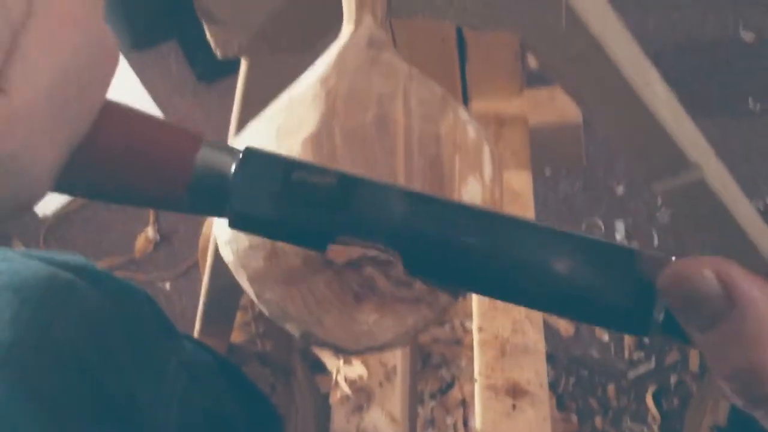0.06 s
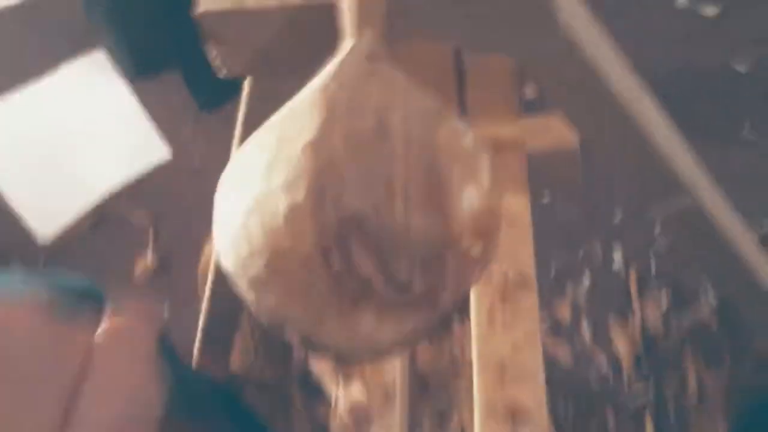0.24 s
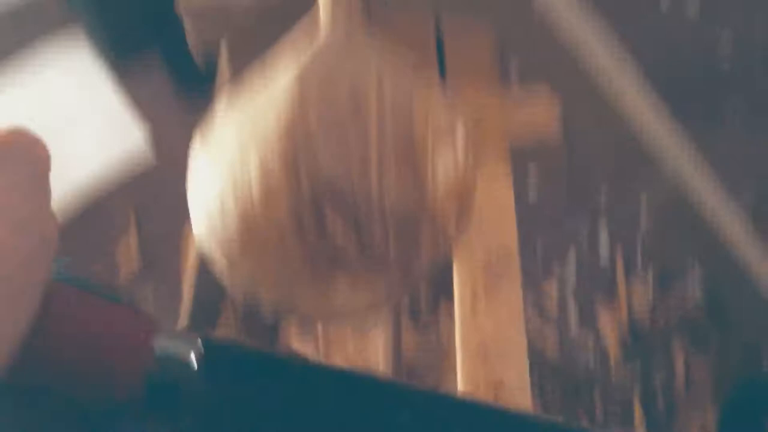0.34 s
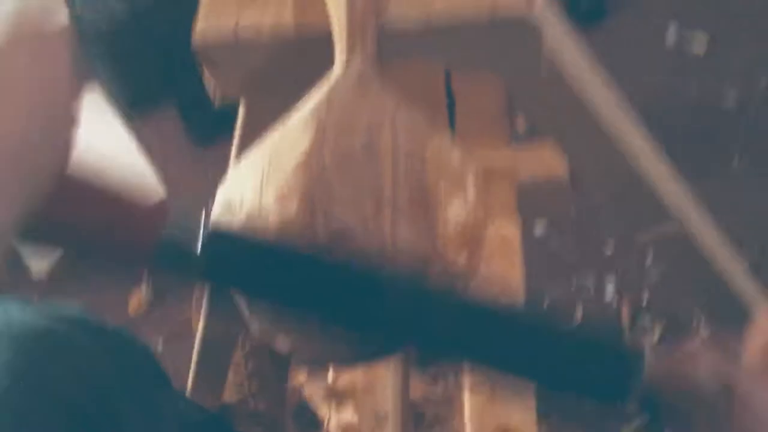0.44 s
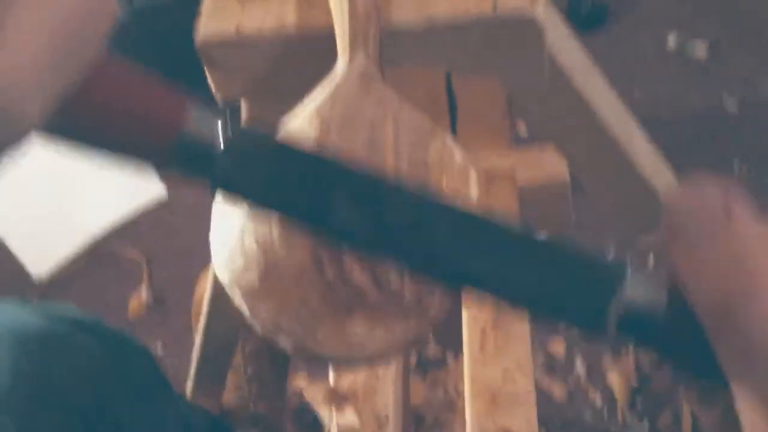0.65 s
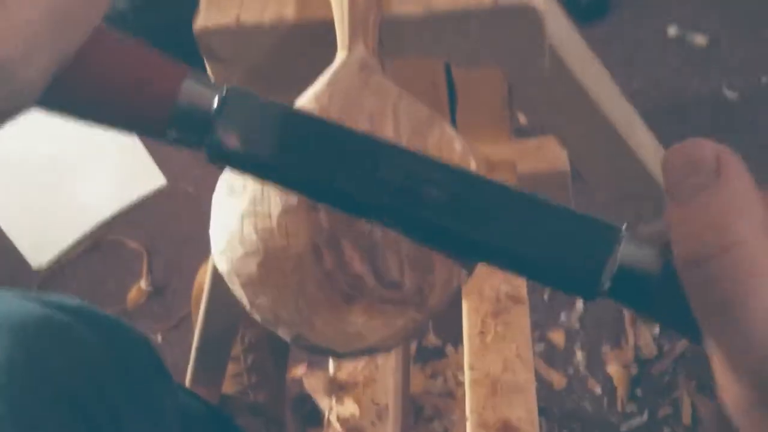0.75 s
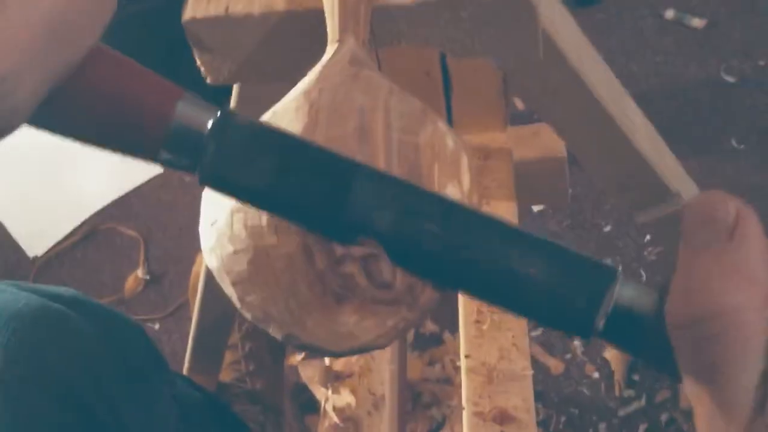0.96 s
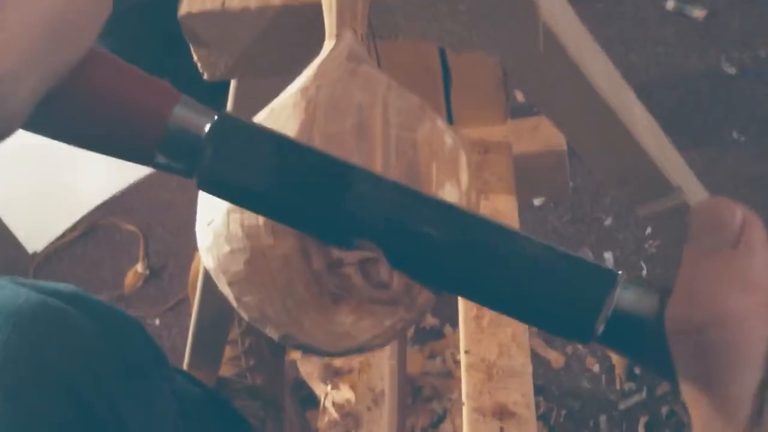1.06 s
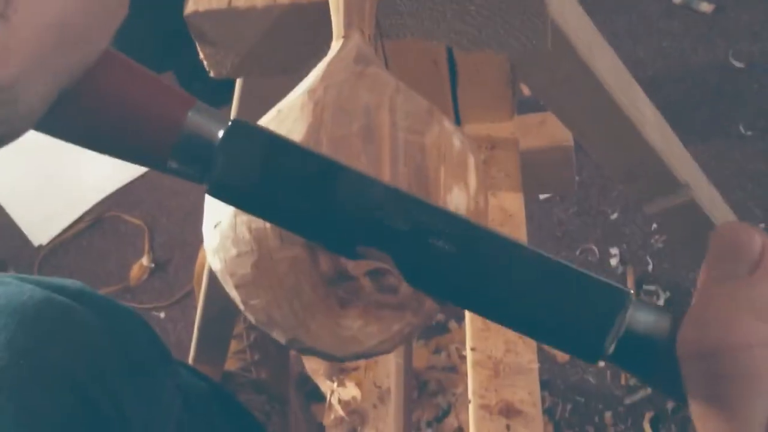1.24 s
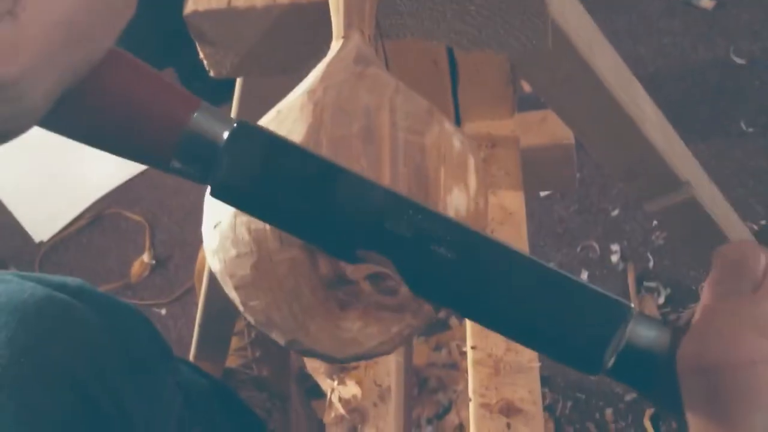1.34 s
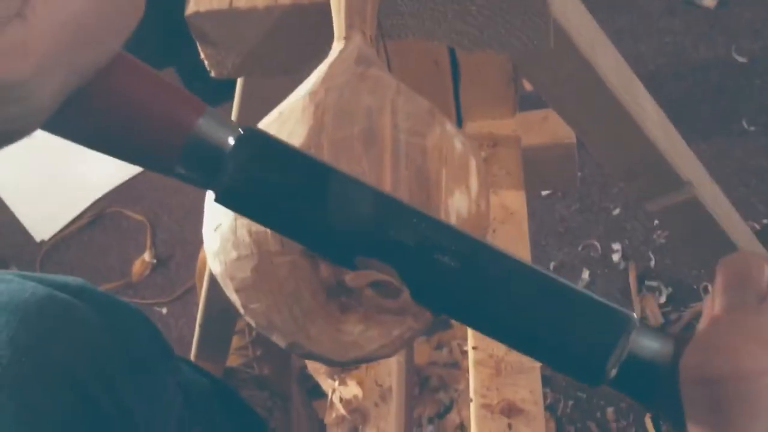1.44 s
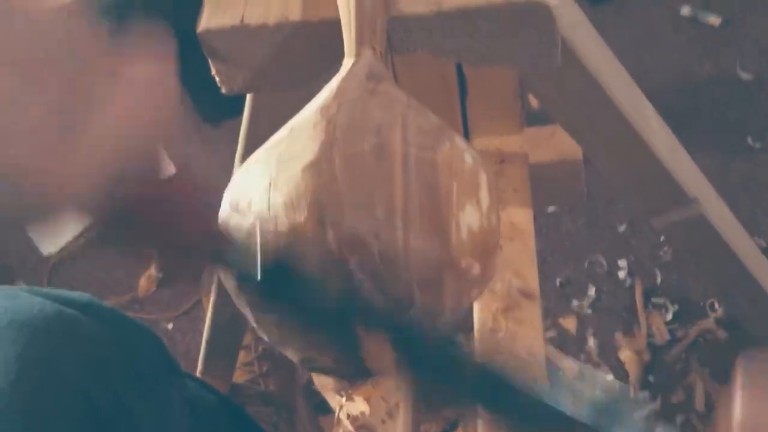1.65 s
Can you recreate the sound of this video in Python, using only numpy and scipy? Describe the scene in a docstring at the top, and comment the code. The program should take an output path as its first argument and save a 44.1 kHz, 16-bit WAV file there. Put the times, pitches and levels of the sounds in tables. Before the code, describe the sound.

Close scraping of a blade cutting wood, with chips snapping off between brief pauses.

```python
"""A drawknife shaves a wooden spoon blank clamped in a shaving horse, close by in a small workshop.
Each stroke is a dense crackle of tearing fibres that shakes the bench; a skidding edge sings briefly.
Chips snap off and set blade and blank ringing; the bench booms as it recoils.
Between strokes the blade is set down on the wood with a dull knock. Faint room air lies underneath."""
import sys
import numpy as np
from scipy import signal
from scipy.fft import rfft, irfft
from scipy.io import wavfile
from scipy.ndimage import uniform_filter1d

SR = 44100
rng = np.random.default_rng(int(sys.argv[2]) if len(sys.argv) > 2 else 0)


def output_pcm(signal):
    """Save a mono or channel-first signal as 16-bit PCM at the path in sys.argv[1].

    Samples are clipped to [-1, 1] before scaling.
    """
    pcm = np.clip(np.atleast_2d(signal).T, -1, 1) * 32767
    wavfile.write(sys.argv[1], SR, np.round(pcm).astype(np.int16))


N = 74970
T = np.arange(N) / SR
CRACK_RISE_S = 0.00026


def amp(db):
    """Decibels to gain."""
    return 10 ** (np.asarray(db) / 20)


def unit(x):
    """Scale to rms 1."""
    return x / np.sqrt(np.mean(x ** 2) + 1e-20)


def log_interp(points, hz):
    """Interpolate (f/Hz, value) points over log frequency."""
    f, value = np.transpose(points)
    return np.interp(np.log(hz + 1), np.log(f), value)


def add(mix, start_s, sound):
    """Mix a sound in at start_s."""
    part = mix[round(start_s * SR):][:len(sound)]
    part += sound[:len(part)]


def colour(x, spectrum, bass_db=0, treble_db=0, peak_hz=1000, peak_db=0, size=4096):
    """Minimum-phase filter: the spectrum at unit power, then two shelves and one peak or dip."""
    bass_hz, treble_hz, peak_sigma_oct = 840, 4500, 0.28
    hz = np.abs(np.fft.fftfreq(size, 1 / SR))
    bass = bass_db / (1 + (hz / bass_hz) ** 4)
    treble = treble_db * (1 - 1 / (1 + (hz / treble_hz) ** 4))
    peak = peak_db * np.exp(-.5 * (np.log2((hz + 1) / peak_hz) / peak_sigma_oct) ** 2)
    log_gain = np.log(unit(amp(log_interp(spectrum, hz))) * amp(bass + treble + peak))
    taps = np.fft.ifft(np.exp(np.conj(signal.hilbert(log_gain)))).real
    return signal.fftconvolve(x, taps[:size // 2])[:len(x)]


def ring(modes, rise_s, size=12000):
    """Struck object: decaying sines of alternating sign, soft onset."""
    t = T[:size]
    sines = sum((-1) ** k * amp(db - 60 * t / t60_s) * np.sin(2 * np.pi * hz * t)
                for k, (hz, db, t60_s) in enumerate(modes))
    return (1 - np.exp(-t / rise_s)) * sines


def burst(decay_s, size=8192):
    """Short crush of fibres: decaying whitened noise."""
    envelope = np.exp(-T[:size] / decay_s) * (1 - np.exp(-T[:size] / CRACK_RISE_S))
    spectrum = rfft(rng.standard_normal(size) * envelope)
    x = irfft(spectrum / (abs(spectrum) + 1e-12)) * np.sqrt(envelope)
    return x * np.sqrt(decay_s * SR / 2) / np.linalg.norm(x)


def room(x, delay_s=0.0024, early_db=9.5, early_decay_s=0.021, smooth_bins=70):
    """Dense early reflections from bench and floor, then the workshop's short tail; whitened."""
    # reverberation time: f/Hz, t60/s
    t60_curve = [(100, 0.96), (300, 1), (700, .43), (1400, .45), (2500, 0.31), (5000, .33), (10000, 0.11),
                 (16000, 0.19)]
    hz, t, noise = signal.stft(rng.standard_normal(SR), SR, nperseg=256)
    decay = amp(-60 * t / log_interp(t60_curve, hz)[:, None])
    tail = signal.istft(noise * decay, SR, nperseg=256)[1][:SR]
    arrived = T[:SR] > delay_s
    early_boost = 1 + amp(early_db) * np.exp(-T[:SR] / early_decay_s)
    spectrum = rfft(tail * arrived * early_boost)
    power = uniform_filter1d(uniform_filter1d(abs(spectrum) ** 2, smooth_bins), smooth_bins)
    response = (irfft(spectrum / np.sqrt(power), SR) * arrived)[:SR // 2]
    return signal.fftconvolve(x, response / np.linalg.norm(response))[:N]


def air(rms_db=-68.5):
    """Workshop air: steady, low-pitched noise."""
    # noise spectrum: f/Hz, level/dB
    spectrum = [(25, -30), (70, -26), (110, -18), (170, 6.5), (260, 0), (400, -17.5), (700, -20),
                (1400, -26), (2500, -40.5), (6000, -44.5), (16000, -43)]
    return amp(rms_db) * unit(colour(rng.standard_normal(N), spectrum))


def knocks(room_db=-8.5):
    """Blade or handles tap the blank: dull burst plus ringing modes."""
    # taps: t/s, level/dB, decay/s, treble/dB
    taps = [(.357, -38.5, 0.0018, -22), (0.492, -52, 0.0016, 6), (.6180, -27, 0.0026, 10),
            (0.6227, -35.5, 0.0043, -33)]
    # impact spectrum: f/Hz, level/dB
    spectrum = [(40, -56), (90, -40), (170, 3.5), (300, 4), (530, 5.5), (950, -3.5), (1400, -1.5),
                (1800, -3), (2500, -13.5), (3900, -17), (4700, -21.5), (5800, -63), (12000, -67)]
    # modes rung by a tap: f/Hz, level/dB, t60/s
    modes = [(181.3, -10.5, 0.085), (268.4, -15, 0.19), (364.5, -14.5, 0.16), (528, -10.5, 0.1),
             (1402, -18, 0.15), (1800, -32, 0.057)]
    x = np.zeros(N)
    for start_s, db, decay_s, treble_db in taps:
        add(x, start_s, amp(db) * colour(burst(decay_s), spectrum, treble_db=treble_db))
        add(x, start_s, amp(db) * ring(modes, rise_s=decay_s))
    return x + amp(room_db) * room(x)


def bench(rise_s=0.0097):
    """The bench recoils and booms when a chip lets go or the blade lands."""
    # recoils: t/s, level/dB
    recoils = [(0.2212, -27.5), (0.2427, -23), (0.6228, -43), (1.639, -40.5)]
    # bench modes: f/Hz, level/dB, t60/s
    modes = [(160.3, 6, 0.13), (138, -8.5, 0.22), (205, -11, .14), (315, -6.5, .1), (172, -20.5, 0.7)]
    x = np.zeros(N)
    for start_s, db in recoils:
        add(x, start_s, amp(db) * ring(modes, rise_s, size=N))
    return x


def skids(room_db=-21):
    """The edge slides without biting; friction excites one narrow resonance."""
    # swells: peak t/s, sigma/s, f/Hz, width/Hz, level/dB
    swells = [(0.487, .011, 4950, 1490, -54), (1.234, 0.012, 4500, 1300, -53.5),
              (1.294, .007, 4600, 1500, -58.5), (1.433, 0.0021, 2750, 300, -40),
              (1.615, 0.025, 4600, 2200, -44.5), (1.671, 0.0022, 2610, 300, -37)]
    hz = np.fft.rfftfreq(N, 1 / SR)
    x = np.zeros(N)
    for peak_s, sigma_s, centre_hz, width_hz, db in swells:
        band = 1 / (1 + ((hz - centre_hz) / (width_hz / 2)) ** 2) ** 2
        friction = unit(irfft(rfft(rng.standard_normal(N)) * band, N))
        envelope = np.exp(-.5 * ((T - peak_s) / sigma_s) ** 2)
        x += amp(db) * envelope * friction
    return x + amp(room_db) * room(x)


def snaps(ring_halfwidth_oct=1.2, room_db=-7, ring_send=0.35):
    """Each chip breaks with a crack; where it breaks sets which modes of blade and blank ring."""
    # chip breaks and blade contacts:
    # t/s, level/dB, bass/dB, treble/dB, decay/s, peak f/Hz, peak gain/dB, ring/dB, ring centre f/Hz
    breaks = [(0.055, -47.5, -9.5, 3.5, 0.0033, 4500, 2, -18, 2500),
              (0.104, -39.5, -4.5, 2.5, 0.0032, 3770, 2.5, -16, 2500),
              (.1160, -39, 0.5, 7.5, 0.0018, 4000, 2, -13, 330),
              (.1685, -44.5, -9.5, 10, 0.00097, 12000, 6, -19.5, 2500),
              (.2165, -28.5, 23.5, 7, 0.005, 405, -18.5, -18, 330),
              (.2188, -6.5, 7, 5, 0.00083, 3800, 9.5, -10, 4000),
              (.2207, -12, 5.5, -3.5, 0.0039, 1680, 8.5, -6.5, 800),
              (.3097, -26.5, -2, 3.5, 0.0024, 6060, 3, -12, 2000),
              (0.4863, -46.5, -17.5, 4.5, 0.00067, 4970, 6, -20.5, 2420),
              (.4912, -43, -13, -5.5, 0.00093, 4800, 13, -23.5, 2400),
              (0.5098, -69.5, -21, -1, .002, 5100, 28, -17, 4500),
              (.9493, -32.5, 11, -0.5, 0.0057, 4500, 0, -24, 700),
              (0.955, -36.5, 12, -32, 0.0052, 1070, 15, -22, 350),
              (1.0562, -11.5, -14.5, -13.5, 0.0048, 1390, 2.5, -10.5, 1380),
              (1.0695, -20, -3, 1, 0.0039, 6700, 6.5, -8.5, 2200),
              (1.3103, -41.5, 16, 7.5, 0.0057, 4630, 7, 5.5, 324),
              (1.3140, -27, -11, -3, 0.003, 3610, 10.5, -10.5, 2000),
              (1.4505, -45.5, 16.5, 11, 0.0023, 4600, 7, 10.5, 328),
              (1.4795, -25, -2.5, -16, 0.0016, 2220, -4, -16.5, 1800),
              (1.6870, -43, -8, 13, 0.00084, 9600, 7, -1, 2500)]
    # crack spectrum: f/Hz, level/dB
    spectrum = [(30, -20), (80, -24.5), (150, -11.5), (320, 0.5), (470, -4.5), (680, -2), (1000, -7),
                (1500, -4.5), (2300, -0.5), (2900, -5), (3400, 0), (3750, -9), (4200, 0.5), (5200, -9),
                (6600, -7), (8200, -14.5), (12000, -15.5), (15800, -20)]
    # blade and blank modes: f/Hz, level/dB, t60/s
    modes = [(322, -7, .1), (660, -10, .045), (738, -9, .1), (1010, -17, .12), (1252, -11, .12),
             (1470, -10, .07), (1716, -11, .12), (1958, -6, .1), (2296, -12, .14), (2370, -7, .1),
             (2686, -15, .07), (3435, -11, .09), (4185, -7, .05), (4640, -17, .09), (6480, -12, .06)]
    cracks, room_cracks, rings = np.zeros((3, N))
    for start_s, db, bass_db, treble_db, decay_s, peak_hz, peak_db, ring_db, ring_hz in breaks:
        crush = amp(db) * burst(decay_s)
        add(cracks, start_s, colour(crush, spectrum, bass_db, treble_db, peak_hz, peak_db))
        # flatter peak or dip in the room send
        add(room_cracks, start_s, colour(crush, spectrum, bass_db, treble_db, peak_hz, 0.4 * peak_db))
        excited = []
        for hz, mode_db, t60_s in modes:
            rolloff_db = 10 * np.log10(1 + (np.log2(hz / ring_hz) / ring_halfwidth_oct) ** 4)
            excited.append((hz, mode_db - rolloff_db, t60_s))
        add(rings, start_s, amp(db + ring_db) * ring(excited, CRACK_RISE_S))
    return cracks + rings + amp(room_db) * room(room_cracks + ring_send * rings)


def strokes(fibres_per_s=8000, spread_db=3.5, chatter_s=0.0059, chatter_db=-1.5, grit_db=2.5,
            room_db=-9.5):
    """Fibres tear in uneven clumps under the blade; the drag shakes the bench."""
    # envelopes, one list per stroke: t/s, rasp level/dB, rumble level/dB, fizz level/dB
    envelopes = [
        [(0.0, -44.5, -41, -54.5), (0.026, -52, -53.5, -61), (0.04, -56.5, -56, -66.5), (0.09, -49, -60, -54),
         (0.122, -46.5, -36, -53.5), (0.156, -33.5, -36, -38), (0.166, -51, -49, -59), (0.184, -40, -38, -47),
         (0.198, -68, -43, -73), (0.208, -50, -38, -52)],
        [(0.82, -96, -71, -111), (0.85, -57.5, -75.5, -71.5), (0.876, -49, -58, -55),
         (0.908, -44.5, -46.5, -47.5), (0.938, -45.5, -56.5, -46.5), (0.95, -38.5, -52, -50.5),
         (0.966, -43.5, -41.5, -55), (1.0, -51, -78, -65), (1.034, -92, -70, -99), (1.04, -68, -80, -87)],
        [(1.095, -42.5, -50.5, -49), (1.131, -51.5, -52, -58), (1.171, -72, -65, -77), (1.183, -71, -67, -83),
         (1.195, -48.5, -70, -65), (1.217, -61, -48, -90), (1.231, -53.5, -69, -88),
         (1.249, -58.5, -67.5, -68.5), (1.269, -87.5, -66, -108), (1.291, -66.5, -78, -93),
         (1.303, -49.5, -62, -63)],
        [(1.335, -57, -44, -64), (1.363, -50, -74, -60), (1.387, -85, -61.5, -96), (1.405, -79, -79, -80)],
        [(1.41, -81, -96, -102), (1.424, -83, -76, -78), (1.432, -51, -73, -54.5), (1.444, -57, -61, -61),
         (1.454, -43.5, -50, -46.5), (1.466, -56, -53.5, -56), (1.482, -34, -50, -58), (1.492, -53.5, -48, -71),
         (1.508, -46, -51.5, -57), (1.55, -84, -82, -93)],
        [(1.555, -103, -71, -103), (1.573, -52.5, -75, -56.5), (1.589, -53.5, -64.5, -58),
         (1.649, -43.5, -34.5, -43.5), (1.669, -33, -49.5, -36), (1.7, -51.5, -43, -69)],
    ]
    # spectra of tearing rasp, bench rumble and treble fizz: f/Hz, level/dB
    rasp_spectrum = [(150, -44), (300, -12.5), (600, -0.5), (950, -1), (1400, -2.5), (1900, 3.5), (2700, 1),
                     (3300, -1), (4600, -4), (6000, -12), (7500, -18.5), (12000, -49.5)]
    rumble_spectrum = [(30, -34.5), (75, -35), (105, -15), (140, 4), (200, 1.5), (250, -1), (335, -0.5),
                       (450, -17), (700, -36.5), (1500, -46.5)]
    fizz_spectrum = [(3000, -38.5), (5500, 3), (7000, -2.5), (9000, 4.5), (11000, -1), (13500, -1),
                     (15800, -4)]
    fade_s, off_db = 0.004, (-100, -100, -100)
    points = []
    for stroke in envelopes:
        points += [(stroke[0][0] - fade_s, *off_db), *stroke, (stroke[-1][0] + fade_s, *off_db)]
    times_s, *levels_db = np.transpose(sorted(points))
    rasp_gain, rumble_gain, fizz_gain = (amp(np.interp(T, times_s, db)) for db in levels_db)

    strengths = amp(spread_db * np.minimum(rng.exponential(1, N), 4)) * rng.choice([-1, 1], N)
    chatter = unit(uniform_filter1d(rng.standard_normal(N), int(chatter_s * SR)))
    tears = rng.random(N) < fibres_per_s / SR
    fibres = unit(strengths * tears * amp(chatter_db * chatter))
    grit = unit(fibres * amp(grit_db * chatter))
    rasp = amp(2) * colour(fibres * rasp_gain, rasp_spectrum)
    fizz = amp(-2) * colour(grit * fizz_gain, fizz_spectrum)
    rumble = amp(0.5) * colour(fibres * rumble_gain, rumble_spectrum)
    x = rasp + fizz + rumble
    return x + amp(room_db) * room(x)


def scene():
    """Mono sum of all sources."""
    return (air() + strokes() + snaps() + skids() + bench() + knocks())[None]


def record(dry, low_cut_hz=80, high_cut_hz=16100):
    """Microphone bass cut, full-scale clipping, band limit."""
    highpass = signal.butter(2, low_cut_hz, "high", fs=SR, output="sos")
    lowpass = signal.firwin(401, high_cut_hz, window=("kaiser", 8), fs=SR)
    clipped = np.clip(signal.sosfilt(highpass, dry), -1, 1)
    return signal.oaconvolve(clipped, lowpass[None], "same")


dry = scene()
out = record(dry)
output_pcm(out)
```